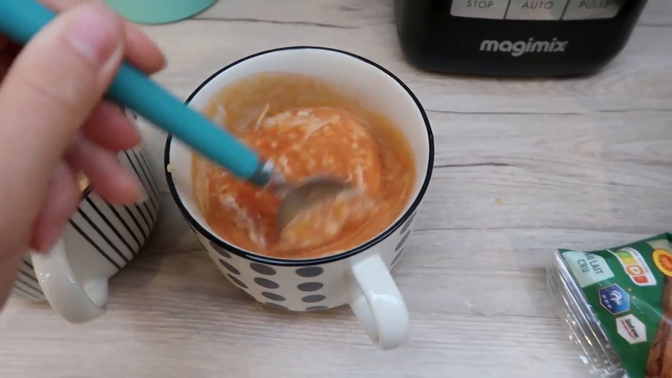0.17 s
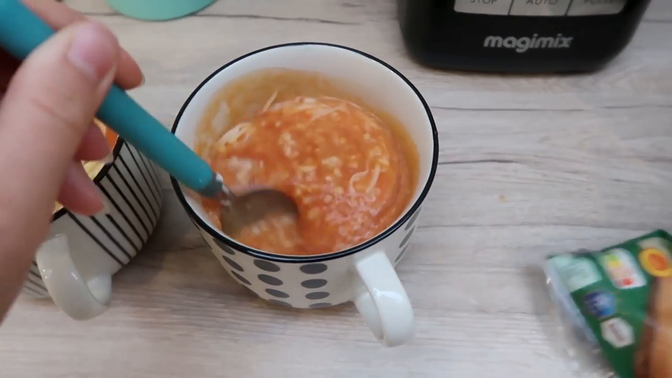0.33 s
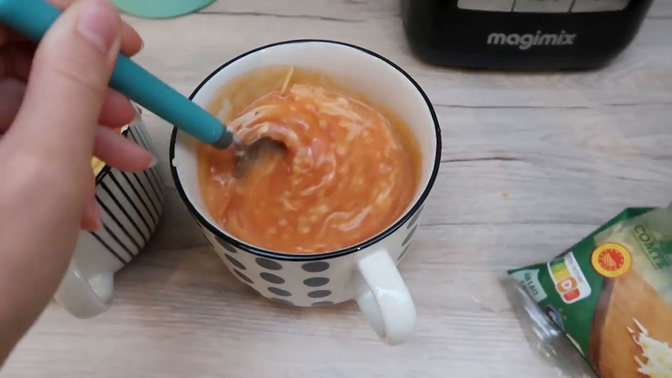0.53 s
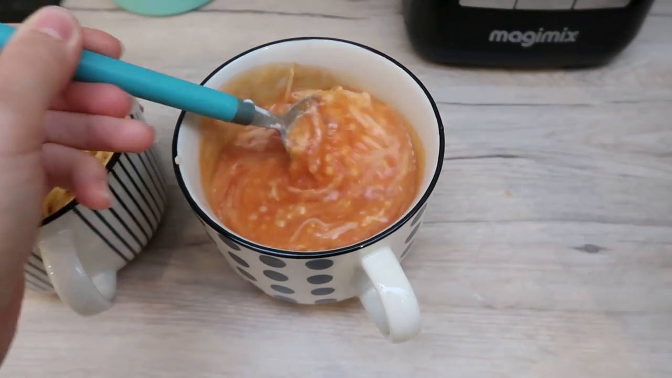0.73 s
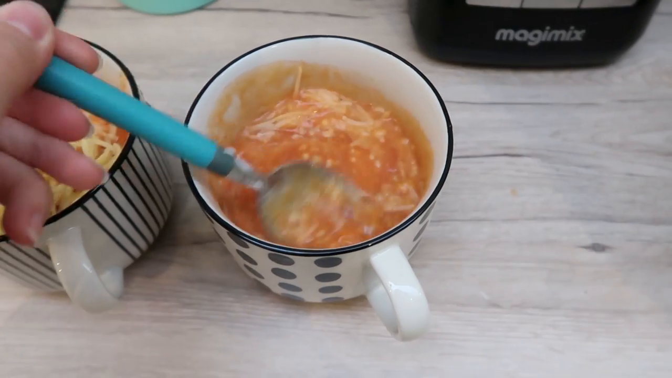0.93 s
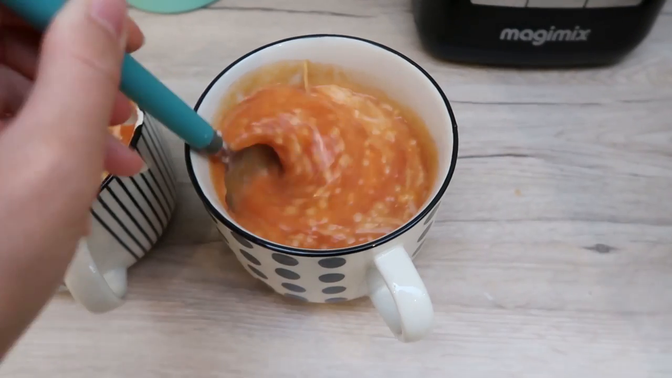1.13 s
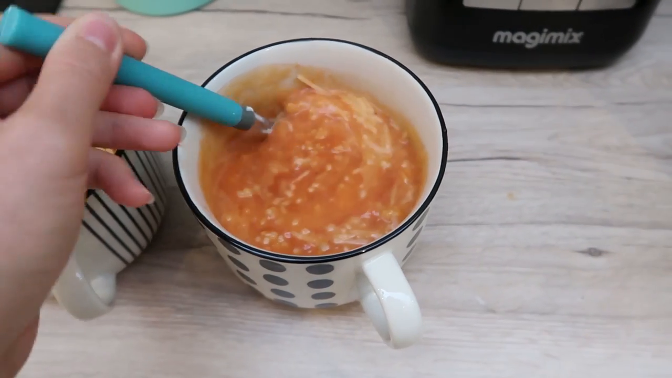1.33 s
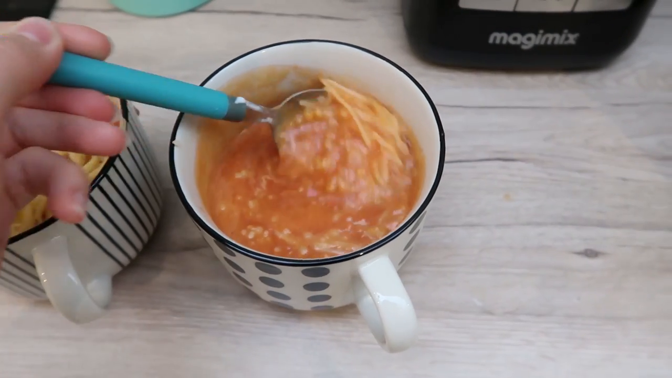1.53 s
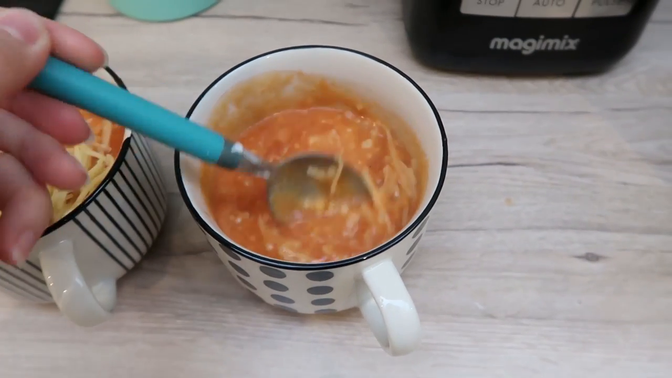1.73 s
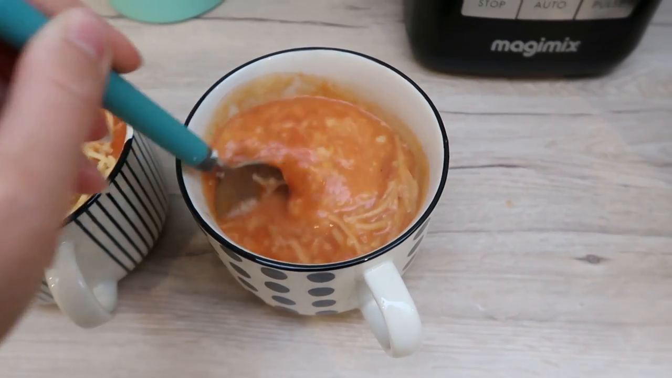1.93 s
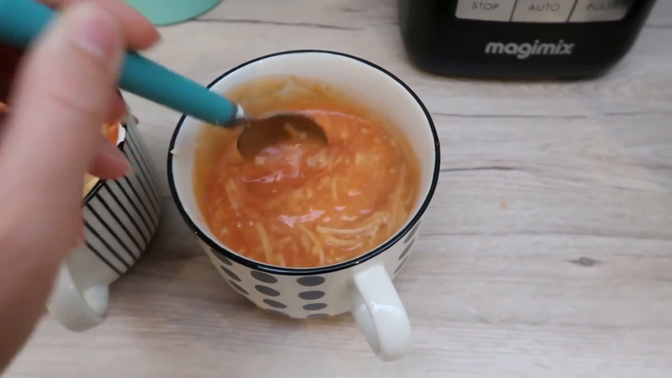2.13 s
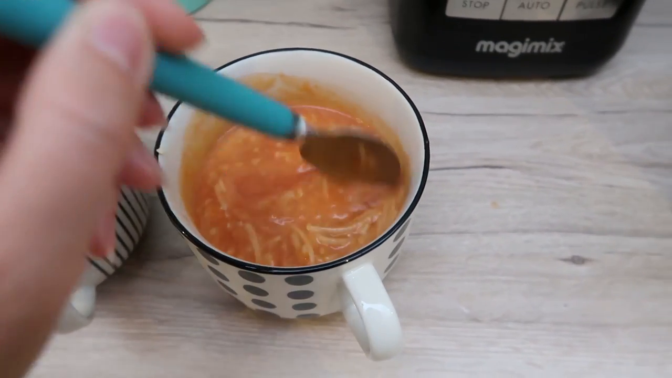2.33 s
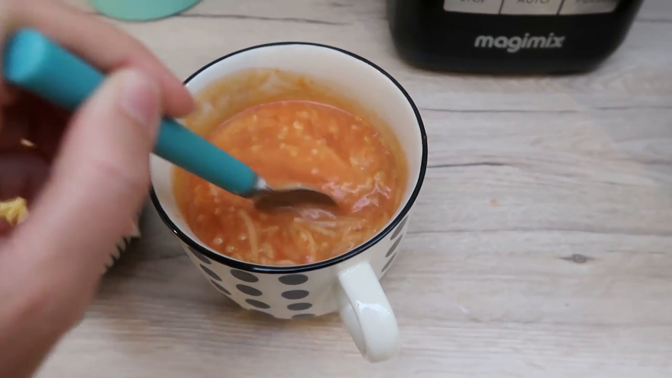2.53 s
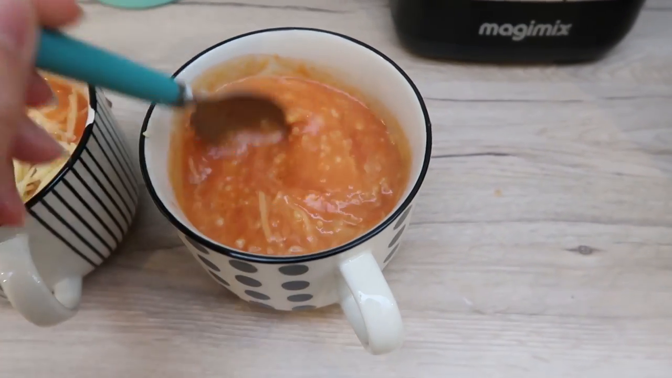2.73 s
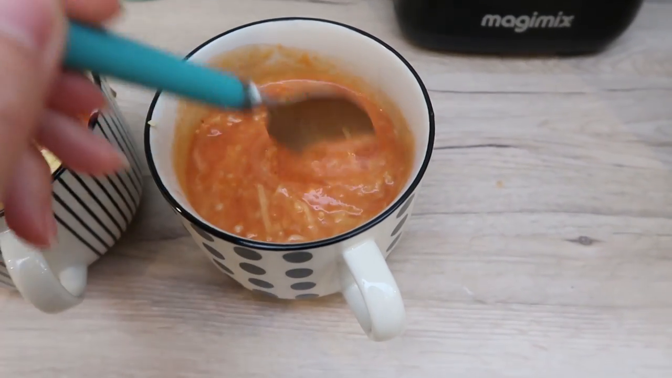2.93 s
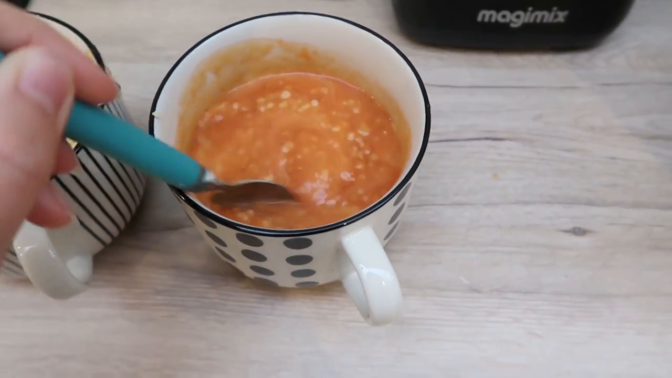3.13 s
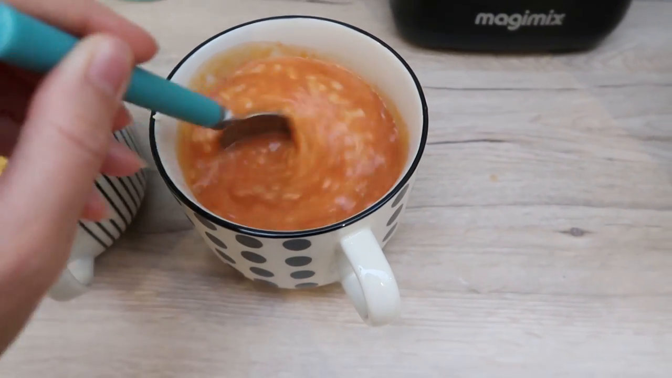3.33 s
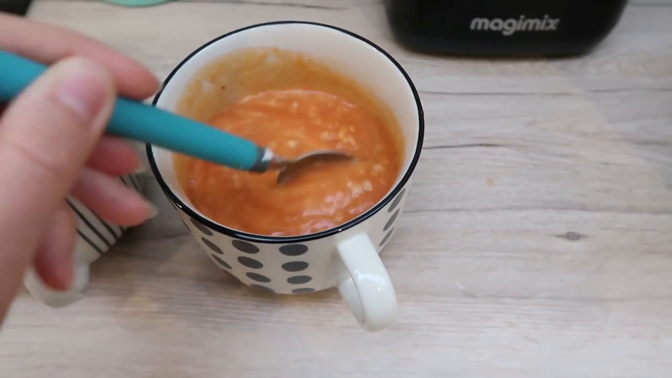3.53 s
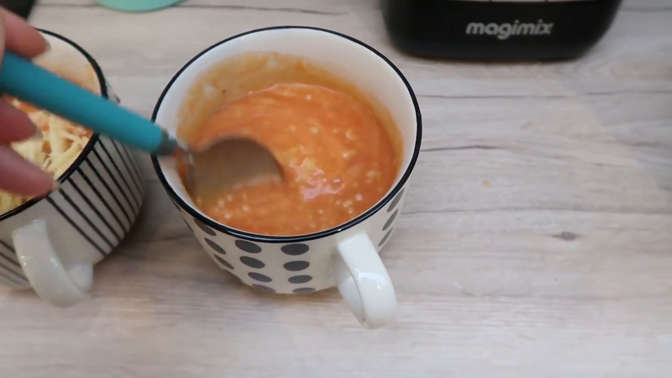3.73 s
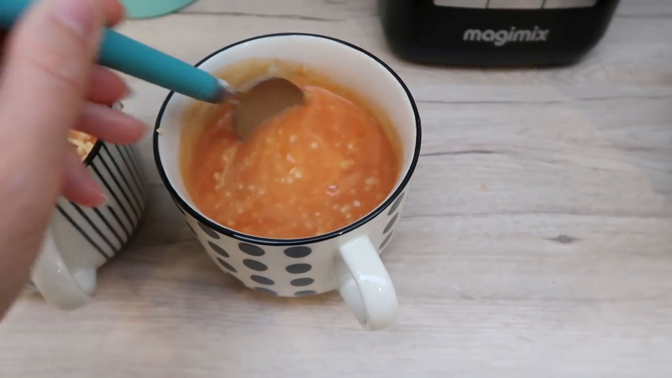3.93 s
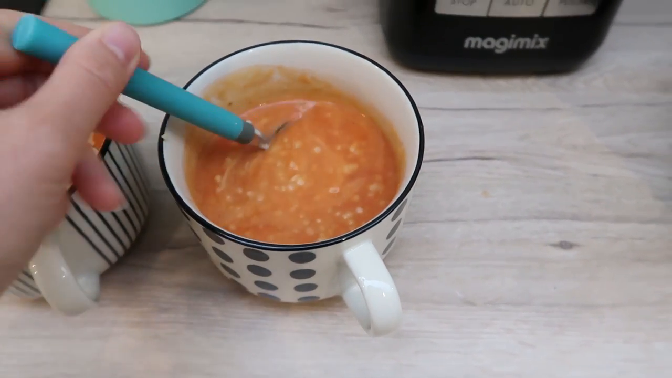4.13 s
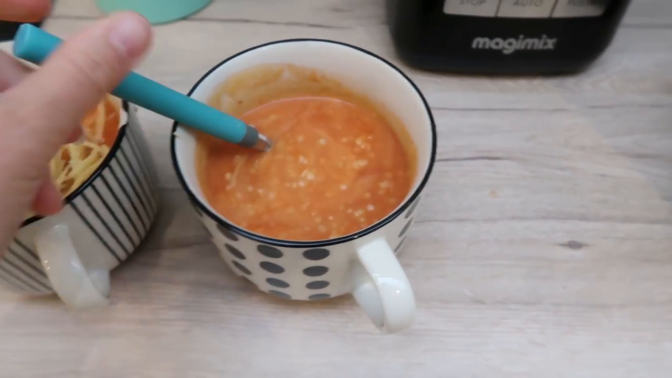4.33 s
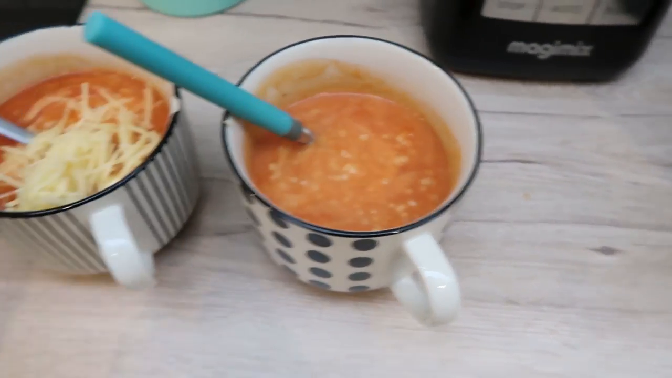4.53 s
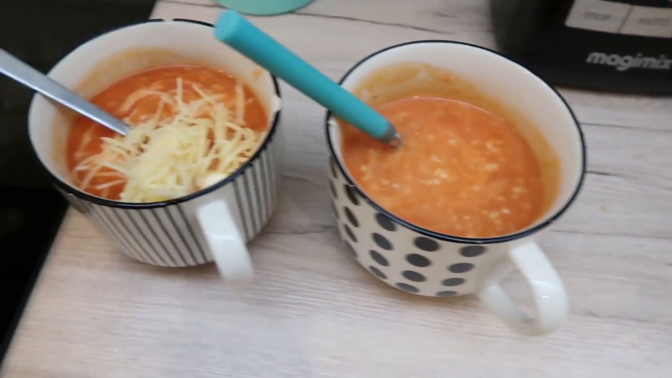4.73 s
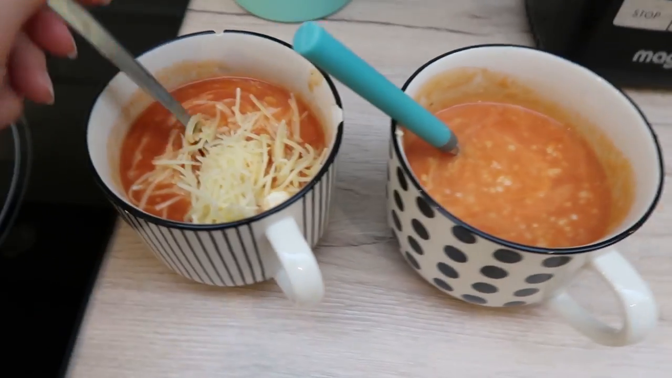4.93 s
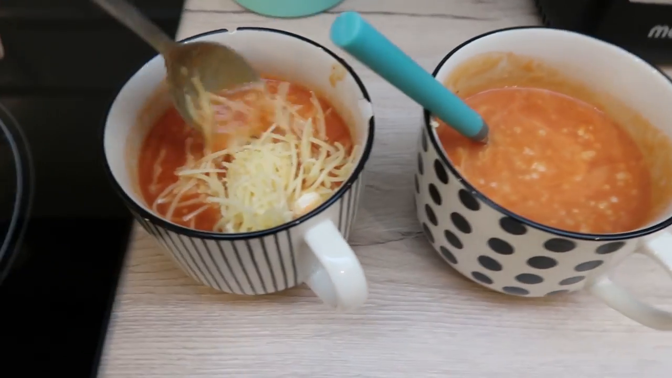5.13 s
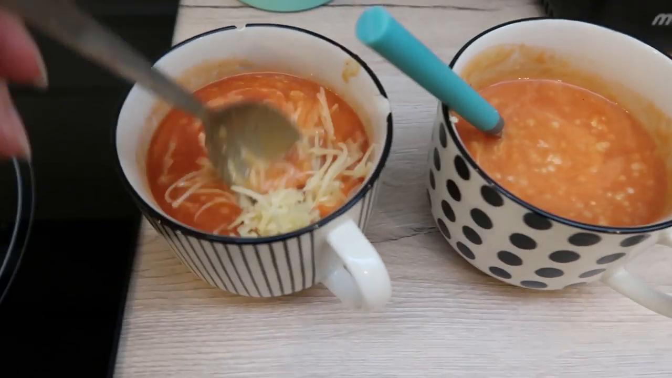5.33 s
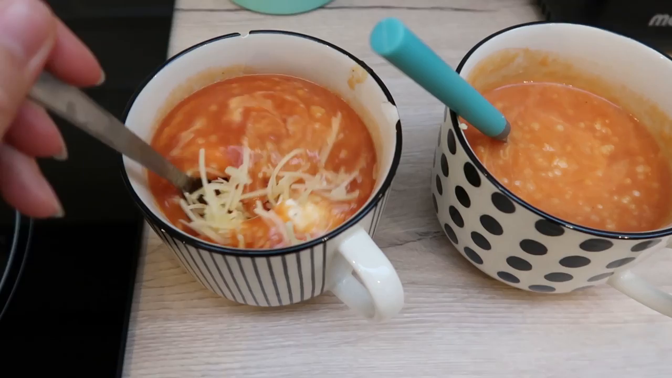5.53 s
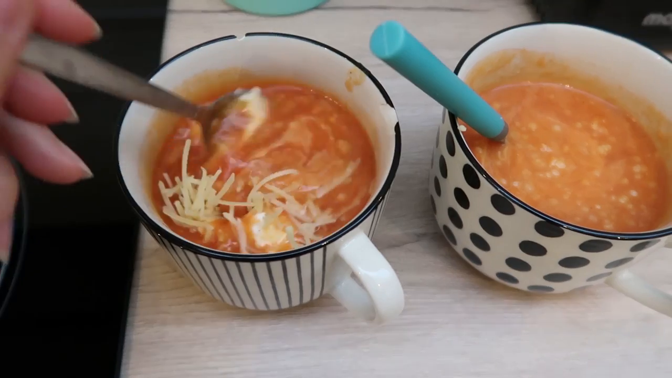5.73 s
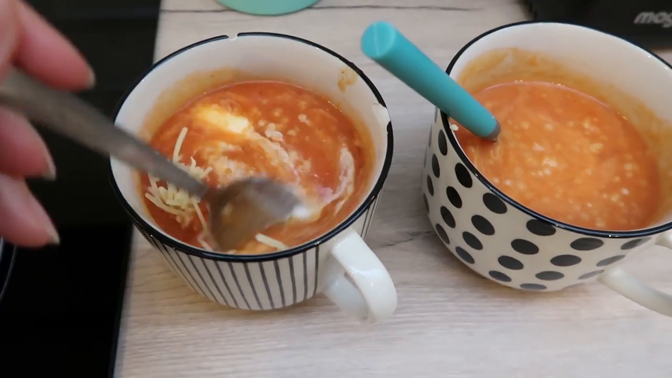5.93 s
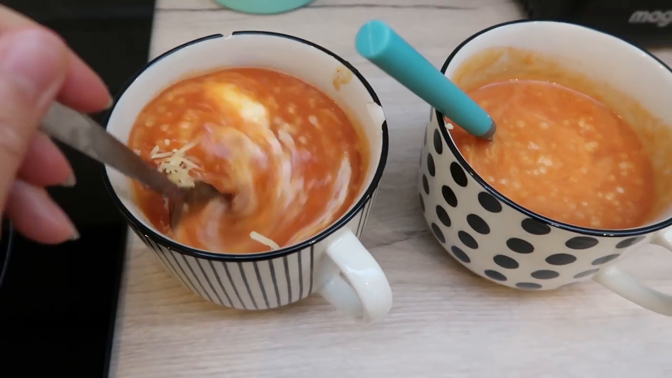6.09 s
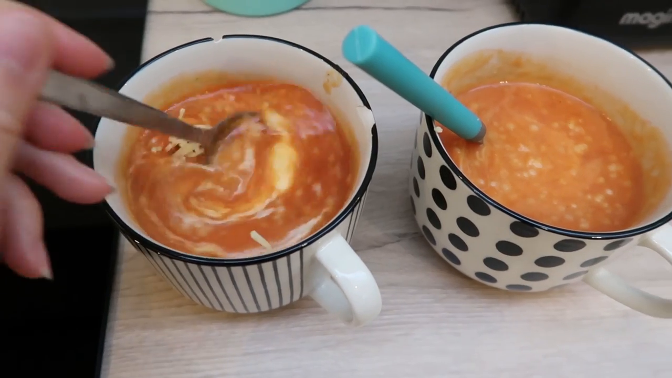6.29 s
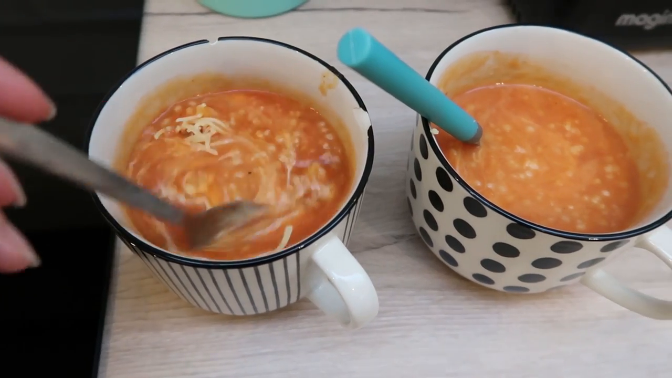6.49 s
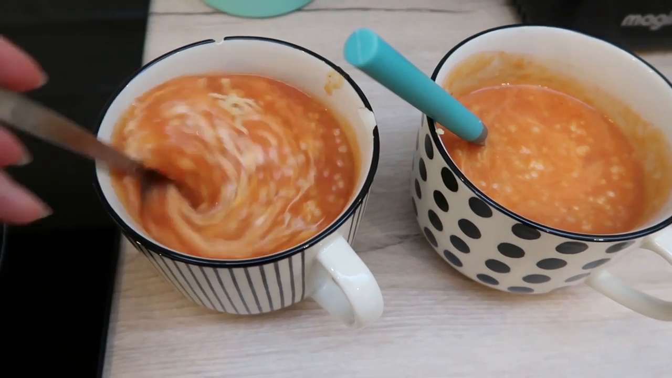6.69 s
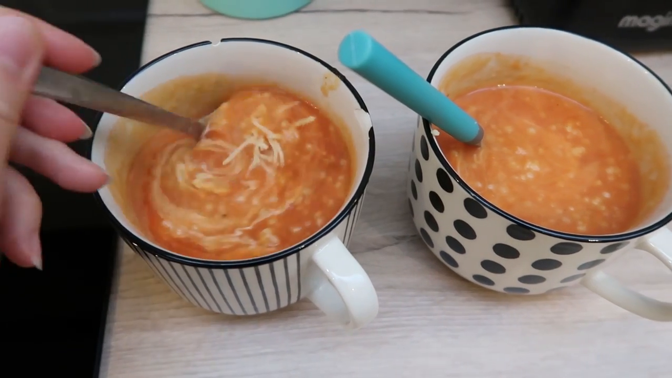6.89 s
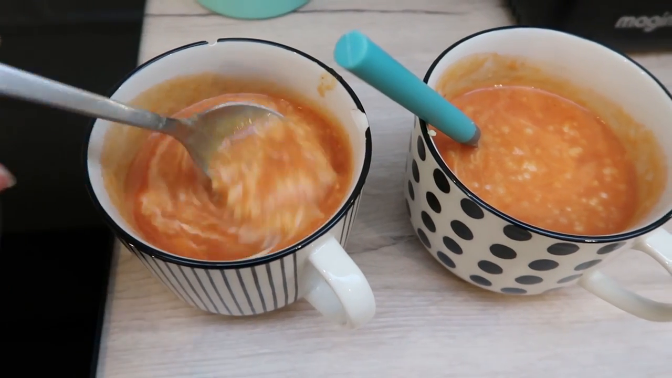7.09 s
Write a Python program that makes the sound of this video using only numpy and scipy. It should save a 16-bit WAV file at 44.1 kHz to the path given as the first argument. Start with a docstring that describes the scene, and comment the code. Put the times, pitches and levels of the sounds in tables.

```python
"""Stirring two mugs of soup

A metal spoon stirs thick soup in a ceramic mug on a worktop, then a second mug is stirred: damped modes
and noise cracks make short clacks. A plastic packet crinkles in pitched ticks and noise bursts; shaped
noise scrapes, shifts things further off and rubs softly; the soup gulps and sine tones hum. Echoes of
near surfaces and a small hard room's tail answer; two close ports pick it all up.
"""
import sys
import numpy as np
from scipy import signal
from scipy.fft import rfft, irfft, next_fast_len
from scipy.io import wavfile
from scipy.ndimage import map_coordinates

SR = 44100
rng = np.random.default_rng(int(sys.argv[2]) if len(sys.argv) > 2 else 0)


def transcribe(signal):
    """Save signal, clipped to [-1, 1], as a 16-bit WAV file at the path in sys.argv[1]."""
    frames = np.atleast_2d(signal).T
    limited = np.clip(frames, -1, 1)
    pcm = np.round(limited * 32767).astype(np.int16)
    wavfile.write(sys.argv[1], SR, pcm)


N = 315329
TIME_S = np.arange(N) / SR
AGE_S = TIME_S[:SR // 3]  # time since the onset of one short sound
TOP_HZ = 15900

# Background air. Each row: frequency in Hz, relative level in dB.
AIR_COLOUR = [(26, -42), (45, -18), (65, -1), (139, -4), (406, -13), (494, -14.5), (662, -21.5),
              (1410, -24), (1760, -28), (2090, -27), (2250, -28), (2730, -28), (7450, -38), (13100, -46.5),
              (15500, -45)]
AIR_DB = -48.5
# Appliance tones. Each row: frequency in Hz, rms level in dB, unsteadiness (ratio).
HUM_TONES = [(37.5, -49.5, 0.35), (100, -54.5, 0.6), (117, -58, 0.7), (13060, -87, .6)]

# A heavy thing slides. Each row: time in s, level in dB before SLIDE_GAIN_DB.
SLIDE_PATH = [(2.965, -45), (2.984, -34), (3.032, -44), (3.07, -29), (3.13, -35), (3.206, -42),
              (3.254, -40), (3.28, -33.5), (3.318, -42), (3.36, -56)]
SLIDE_GAIN_DB = -2
# Spectrum of the slide. Each row: frequency in Hz, relative level in dB.
SLIDE_COLOUR = [(53, -26), (90, 3), (168, 2.5), (273, -2.5), (437, 1.5), (467, -2), (562, -1), (870, 0),
                (2230, -17.5), (3020, -45), (5000, -48), (6500, -40), (11000, -120)]
# Edges in Hz of the registers that judder apart.
SLIDE_EDGES_HZ = [60, 300, 550, 850, 1300, 12000]

# Scrapes, things shifted further off, and the warm tail of the opening knock.
# Each row: start in s, level in dB, resonance in Hz, length in s.
SCUFFS = [(0.02, -28, 990, 0.054), (0.068, -32.5, 1030, 0.079), (0.559, -33, 2400, 0.063),
          (0.71, -36, 2100, 0.043), (0.648, -37.5, 537, .04), (1.271, -37, 1000, 0.021),
          (1.371, -36, 1500, 0.11), (1.429, -31, 990, 0.045), (1.466, -36, 2100, 0.022),
          (1.517, -31.5, 2200, .03), (1.56, -33, 1400, 0.044), (1.768, -29.5, 2240, 0.068),
          (1.868, -36.5, 1190, 0.042), (2.281, -37, 1700, 0.035), (2.455, -24, 1500, .04),
          (2.47, -20, 2090, 0.023), (2.501, -32.5, 1680, 0.057), (2.887, -31.5, 890, 0.066),
          (2.966, -26, 1410, 0.053), (3.0473, -35.5, 504, .05), (3.413, -29.5, 1150, 0.012),
          (3.56, -48.5, 540, 0.047), (3.726, -32.5, 1390, 0.031), (3.799, -39, 1190, 0.051),
          (3.941, -37.5, 780, 0.017), (3.961, -36.5, 2400, 0.019), (3.99, -36.5, 1370, 0.045),
          (4.064, -36, 1120, .04), (4.261, -38.5, 1000, 0.05), (4.354, -32.5, 2300, .03),
          (4.443, -36, 1750, 0.11), (4.488, -33, 3050, 0.046), (4.622, -38.5, 2030, 0.049),
          (4.652, -31.5, 2870, 0.059), (4.694, -39.5, 2300, 0.085), (4.815, -34.5, 2400, 0.065),
          (4.908, -39.5, 1690, .04), (4.927, -35, 860, 0.039), (5.022, -41.5, 1100, 0.022),
          (5.284, -39.5, 1900, 0.036), (5.874, -36.5, 2320, 0.026), (6.08, -37.5, 1380, 0.026),
          (6.304, -38, 1850, 0.037), (6.484, -42, 1000, 0.042), (6.587, -39, 910, 0.045),
          (6.628, -33, 1360, 0.1), (6.76, -38.5, 930, 0.025), (6.995, -38, 1400, 0.019),
          (7.03, -47.5, 710, 0.043)]
# Spectrum of scuffs and rubbing. Each row: frequency in Hz, relative level in dB.
SCUFF_COLOUR = [(76, 2), (130, 11), (146, -2), (175, -48), (255, 3.5), (318, 7), (351, 1), (718, -2.5),
                (948, -5), (2880, -11.5), (11100, -39.5), (13600, -42), (15000, -84)]
SCUFF_RISE_S, SCUFF_T60_S, SCUFF_RESONANCE_DB = .008, .4, 8
SCUFF_LOW_DB, SCUFF_TREBLE_DB = -11.5, -30.5  # for a resonance at 1 kHz
THINNER_DB_PER_OCTAVE, BRIGHTER_DB_PER_OCTAVE = 14, 8

# Soft swells of rubbing: spoon in soup, packet handling, the opening knock dying away.
# Each row: start in s, length in s, level in dB, brightness in dB.
SWELLS = [(0.0, 0.36, -48.5, 6), (0.276, 0.69, -49, 10.5), (0.637, 0.17, -52, -8), (0.876, 0.17, -47, 9),
          (1.26, 0.49, -47, 4.5), (1.796, 0.18, -46.5, 3.5), (1.963, 0.44, -47.5, 1),
          (2.237, 0.86, -54.5, 5), (2.455, 0.32, -41.5, -6), (2.87, 0.67, -48, 4.5),
          (3.73, 0.3, -50.5, 4.5), (4.366, 0.39, -52, 6), (4.682, 0.49, -51.5, 8.5), (5.504, 0.18, -63, 14),
          (5.977, 0.47, -54, -1), (6.217, 0.64, -57, 8), (6.646, 0.61, -54.5, -6)]
SWELL_SKEW = .55  # under 1: the swell peaks early, then eases
IDLE_DB = -64  # friction between swells
RUB_LOW_DB, RUB_TREBLE_DB = -5, -13.5  # against the middle
RUB_LOW_CUT_DB_PER_BRIGHT_DB = 0.053

# Air gulped by the soup. Each row: start in s, frequency in Hz, peak in dB, length in s.
GLOOPS = [(2.882, 214.7, -20, 0.045), (3.05, 178, -28.5, 0.043)]
# Bubbles bursting on the soup. Each row: start in s, frequency in Hz, typical level in dB.
POPS = [(2.8258, 2550, -34)]
SQUELCH_SPAN_S = (2.97, 3.26)  # soup folds over the spoon: start and end in s
SQUELCH_HZ, SQUELCH_LOG_SPREAD, SQUELCH_DB = 850, .55, -34  # typical pitch, its spread, typical level

CRINKLE_SPAN_S = (.39, .755)  # the packet is lifted: start and end in s
# Crinkle rms level in dB: low, middle, treble before it dulls.
CRINKLE_DB = [-47, -44.5, -39.5]
CRINKLE_DULLS_DB_PER_S = 37
CREASE_HZ, CREASE_LOG_SPREAD, CREASE_CYCLES = 2600, .55, 18  # typical pitch, its spread, t60 in cycles
# Separate snaps of plastic film and soup, from sharp to very faint.
# Each row: start in s, level in dB, crispness in dB, resonance in Hz.
SNAPS = [(0.4177, -33, 1, 3300), (0.4249, -20.5, 8.5, 2950), (0.427, -18.5, -4, 2950),
         (0.431, -18.5, 4, 2480), (0.525, -27, -8, 2000), (0.552, -28, -3, 2800), (0.592, -23.5, 0, 2980),
         (0.6276, -24, -2, 3530), (0.6539, -29, -3, 1700), (0.6628, -21.5, -4, 1100),
         (0.682, -27, -11, 2000), (0.6933, -16, 1.5, 3440), (0.7427, -31, -18, 900),
         (0.7725, -17.5, -18, 1460), (0.7921, -21.5, -16, 1380), (0.808, -19.5, 2.5, 2100),
         (0.8269, -23, -19, 1950), (1.056, -32.5, -6, 1820), (1.149, -23, -8.5, 1490),
         (1.319, -32.5, 0.5, 3480), (1.731, -42, 2.5, 4030), (1.776, -32, -1, 2200), (2.722, -55, 14, 4000),
         (2.814, -51, 14, 5000), (2.904, -31, -11, 1300), (2.971, -34, -6, 1100), (5.457, -61, 20, 4000)]
# Spectrum of snaps and creases. Each row: frequency in Hz, relative level in dB.
SNAP_COLOUR = [(76, -30.5), (130, -1), (282, -12), (454, -2), (637, -23.5), (1330, -2.5), (1790, 1.5),
               (3450, -6), (4460, -14.5), (9310, -20), (15000, -44)]
SNAP_LOW_CUT_DB_PER_CRISP_DB = 0.019

# The spoon drags on the wall and a mode sings. Each row: start in s, length in s, frequency in Hz, level in dB.
DRAGS = [(4.176, 0.06, 850, -42.5), (1.365, 0.06, 860, -46)]
# Bright clinks that ring on. Each row: start in s, peak in dB.
CLINKS = [(0.3776, -11)]
# Mug modes above the soup. Each row: frequency in Hz, relative level in dB.
CLINK_MODES = [(320, -11), (1110, -10), (1450, -8), (1954, -11), (2660, -9), (3090, -1), (3257, 0),
               (3500, -5), (3690, -10), (5010, -12), (5600, -14), (6400, -10), (8441, -27)]
# Modes of the spoon itself. Each row: frequency in Hz, relative level in dB.
STEEL_MODES = [(3246, -6), (6500, -18)]
CLINK_T60_S, STEEL_T60_S = .085, .25  # at 1 kHz

# Spoon against mug; the faint row at 2.85 s is a drip into the soup, voiced the same way. Each row: start in s,
# level in dB, strongest resonance in Hz, next strongest in Hz, resonance with a node at the contact in Hz,
# worktop thud in dB, weight of the blow in dB, hardness in dB.
KNOCKS = [(0.0048, -8.5, 1570, 3300, 2080, 6, 8.5, 10.5), (0.491, -11.5, 1310, 2120, 3180, -24, 4, -7.5),
          (1.1052, -13.5, 1160, 3120, 2040, -3.5, -5.5, -4),
          (1.1085, -17.5, 1460, 1030, 2560, -17, -13, 4.5), (1.2458, -7, 1160, 2230, 1450, -8, 0.5, -5.5),
          (1.9805, -15, 1530, 3130, 2570, -8, -8, 4), (2.0815, -8.5, 1320, 2690, 2450, -3.5, -1, -6.5),
          (2.6069, -9.5, 2730, 1830, 2240, 2.5, -1.5, 4.5), (2.8468, -42.5, 1490, 345, 2600, 26.5, 15, -8),
          (3.261, -24.5, 912, 2630, 1820, 2, 4, 2), (3.2785, -8.5, 2540, 1500, 1780, -8, -3.5, -6),
          (4.1699, -21.5, 940, 2600, 1550, 9.5, 2.5, -7.5), (4.201, -30.5, 830, 2420, 1490, -3, 10.5, -5),
          (4.348, -11.5, 1440, 2340, 3000, 5.5, 4, -4.5), (4.353, -20.5, 1490, 2500, 2010, 17.5, 6, -3),
          (4.3661, -20, 1800, 2260, 1310, -1, 3, -14), (4.3769, -24.5, 1470, 2750, 2100, 12, 7, -18),
          (4.451, -43, 1950, 3350, 2600, -5, -11, -8), (5.679, -29, 840, 2600, 1980, 2.5, 0.5, -12),
          (6.2094, -8, 1770, 3400, 1180, 5.5, 1.5, 1.5), (6.6269, -23, 4540, 2950, 3830, -14, -23, 10.5),
          (6.8305, -7.5, 850, 2680, 1850, 1.5, -1.5, -2.5), (6.854, -21.5, 1490, 4020, 900, -6, -6, -3)]
SECOND_MUG_FROM_S = 5
# Modes of each full mug with its spoon, the lowest shared with the worktop.
# Each row: frequency in Hz, relative level in dB.
FIRST_MUG = [(160, -17), (205, -16.5), (330, 0), (490, 4), (800, -4.5), (920, -5), (1120, -6), (1310, -0.5),
             (1460, 4), (1640, 2.5), (1790, -1), (2020, -1), (2240, -1), (2560, 10.5), (2740, 12),
             (3150, 10.5), (3420, 8), (4350, -8.5), (4950, -9), (5550, -9.5), (6480, -9), (7540, -31)]
SECOND_MUG = [(140, 5), (195, 4.5), (370, 7), (460, 3.5), (885, -1.5), (1380, 8.5), (1510, 11), (1720, 6),
              (1900, 1.5), (2220, 5.5), (2640, 15), (3150, 16.5), (3430, 12.5), (3750, 9.5), (4100, 2),
              (5050, -6.5), (5700, -3), (7100, -3.5), (7900, -9)]
# Flexing modes of each rim, which the soup damps least. Each row: frequency in Hz, dB against the knock level.
FIRST_RIM = [(880, -26), (2240, -27), (2600, -44), (3300, -45)]
SECOND_RIM = [(890, -23), (1460, -34), (1590, -30), (1980, -33), (2680, -26), (3390, -26)]
FIRST_T60_S, SECOND_T60_S, RIM_T60_S = .023, .025, .13  # at 1 kHz
# Steel on glaze. Each row: frequency in Hz, relative level in dB.
CRACK_COLOUR = [(250, -25), (620, -20), (1400, 2), (3500, 22), (7000, 5), (11000, 3), (15000, 4)]
# An average blow, dB against the knock level: thud, base, belly, wall, rim, tick.
BLOW_DB = [-27.5, -24, -22, -18, -17.5, -22.5]
BELLY_DB_PER_WEIGHT_DB, RIM_DB_PER_HARDNESS_DB = 0.11, 0.32
HOLLOW_HZ, HOLLOW_DB = 665, -36  # the mug hardly radiates between its base and belly modes

# Band edges in Hz for knocks and for noises.
KNOCK_EDGES_HZ = [100, 260, 650, 1200, 2100, 4200, 16000]
NOISE_EDGES_HZ = [130, 900, 4200, 16000]

# Room decay. Each row: frequency in Hz, t60 in s.
ROOM_T60 = [(120, 0.36), (700, 0.3), (2000, 0.29), (5000, 0.2), (12000, 0.091)]
# Near surfaces. Each row: delay in s, level in dB.
WALLS = [(.0063, -12), (.0098, -20), (.0135, -20), (.0165, -21)]
# Diffuse sound. Each row: frequency in Hz, side against mid in dB.
WIDTH = [(40, -65), (150, -17), (400, -8.5), (1400, -11.5), (3000, -5.5), (6000, -0.5), (12000, 9)]
# Lead of the left port, for mugs and for packet. Each row: frequency in Hz, phase in radians.
MUG_PHASE = [(1000, 0), (3500, .15), (6000, .8), (9000, 1.6), (14000, 2)]
PACKET_PHASE = [(500, 0), (1900, -.25), (3600, -.7), (7000, -1.5), (11000, -2.4)]
# Share of the mugs' sound that fills the room. Each row: frequency in Hz, gain in dB.
TAIL_COLOUR = [(150, 1), (400, -1.5), (900, 3), (1500, -3), (2600, -4.5), (6000, -1.5)]
ROOM_AIM = .4  # the room is fed from all sides of the mug: only this share of the contact's colouring
# Microphone response. Each row: frequency in Hz, gain in dB.
MICROPHONE = [(15, -30), (32, 0), (11000, 0), (15900, -9)]


def amp(db):
    """Decibels to gain."""
    return 10 ** (np.asarray(db) / 20)


def unit(x):
    """Scale to rms 1."""
    return x / np.sqrt(np.mean(x ** 2) + 1e-20)


def fade(t60_s, t_s=AGE_S):
    """Exponential decay, down 60 dB after t60_s."""
    return np.exp(-np.log(1000) * t_s / np.maximum(t60_s, 1e-4))


def along(points, hz):
    """Read (Hz, value) points on a log axis."""
    point_hz, value = np.transpose(points)
    return np.interp(np.log(hz + 1), np.log(point_hz + 1), value)


def bump(hz, centre_hz, log_width):
    """Bell curve on a log-frequency axis, 1 at its centre."""
    return np.exp(-(np.log((hz + 1) / centre_hz) / log_width) ** 2)


def wobble(rate_hz):
    """Smooth random curve, rate_hz knots a second."""
    knots = rng.standard_normal(int(N * rate_hz / SR) + 4)
    return map_coordinates(knots, [TIME_S * rate_hz])


def filtered(x, response):
    """Multiply the spectrum by a response of frequency."""
    n = x.shape[-1]
    padded = next_fast_len(n + SR // 8)
    spectrum = rfft(x, padded) * response(np.fft.rfftfreq(padded, 1 / SR))
    return irfft(spectrum, padded)[..., :n]


def noise(colour, size=N):
    """Coloured noise of rms 1."""
    return unit(filtered(rng.standard_normal(size), lambda hz: amp(along(colour, hz))))


def chance_colour(colour, depth_db, count=45):
    """Spectrum with the random resonances of one crease or object."""
    hz = np.geomspace(NOISE_EDGES_HZ[0], NOISE_EDGES_HZ[-1], count)
    return np.column_stack([hz, along(colour, hz) + depth_db * rng.standard_normal(count)])


def bands(x, edges_hz):
    """Causal split into neighbouring bands."""
    filters = [signal.butter(3, pair, "band", fs=SR, output="sos") for pair in zip(edges_hz, edges_hz[1:])]
    return [signal.sosfilt(sos, x) for sos in filters]


def voiced(x, edges_hz, levels_db):
    """Set each band's rms over the first 30 ms of a short sound."""
    early = AGE_S < .03
    parts = bands(x, edges_hz)
    return sum(amp(db) * part / np.sqrt(np.mean(part[early] ** 2)) for db, part in zip(levels_db, parts))


def add(track, start_s, sound):
    """Mix a sound into the track."""
    start = max(round(start_s * SR), 0)
    track[start:start + len(sound)] += sound[:N - start]


def ring(modes, t60_s, scatter_db):
    """Damped modes, high ones dying sooner, strengths and pitches scattered each time."""
    hz, db = np.transpose(modes)
    chance = rng.standard_normal((len(hz), 2))
    db = db + scatter_db * chance[:, 0]
    hz = hz[:, None] * (1 + .008 * chance[:, 1:])
    life_s = t60_s * (1000 / hz) ** .4
    sign = (-1) ** np.arange(len(hz))
    return (sign * amp(db)) @ (np.sin(2 * np.pi * hz * AGE_S) * fade(life_s))


def struck(x):
    """Minimum phase: same spectrum, all parts starting together as after one sharp blow."""
    cepstrum = irfft(np.log(np.abs(rfft(x)) + 1e-6), len(x))
    fold = np.where(AGE_S == 0, 1, 2 * (AGE_S < AGE_S[-1] / 2))
    return irfft(np.exp(rfft(cepstrum * fold)), len(x))


def diffuse(mid, side):
    """Sound from all around: two close ports agree in the bass and part in the treble."""
    side = filtered(side, lambda hz: amp(along(WIDTH, hz)))
    return np.array([mid + side, mid - side])


def room(x):
    """Noise tail that builds up over a few ms; each frequency dies at its own speed."""
    hz, t_s, z = signal.stft(rng.standard_normal((2, SR // 2)), SR, nperseg=256)
    build = 1 - np.exp(-t_s / .005)
    decay = fade(along(ROOM_T60, hz)[:, None], t_s)
    tail = signal.istft(z * decay * build, SR, nperseg=256)[1]
    tail = diffuse(*tail) / np.linalg.norm(tail[0])
    return signal.fftconvolve(x[None], tail, axes=1)[:, :x.size]


def reverberate(x, count=9):
    """Each stretch of sound meets a different room tail."""
    out = np.zeros((2, N + SR))
    for piece in np.array_split(np.arange(N), count):
        wet = room(np.pad(x[piece], (0, SR // 2)))
        out[:, piece[0]:piece[0] + wet.shape[1]] += wet
    return out[:, :N]


def nearby(x, phase, dull_hz=3500):
    """Direct sound meets the two ports out of step; near surfaces return duller copies."""
    def echoes(hz):
        copies = sum(amp(db) * np.exp(-2j * np.pi * hz * delay_s) for delay_s, db in WALLS)
        return copies / (1 + (hz / dull_hz) ** 2)

    def ports(hz):
        return np.exp(np.outer([.5j, -.5j], along(phase, hz)))

    return filtered(x, lambda hz: ports(hz) * (1 + echoes(hz)))


def air():
    """Steady diffuse noise, strongest in the bass."""
    return amp(AIR_DB) * diffuse(noise(AIR_COLOUR), noise(AIR_COLOUR))


def hum():
    """Appliance tones and a faint electronic whine, wavering in level and phase."""
    total = 0
    for hz, db, unsteady in HUM_TONES:
        swell = 1 + unsteady * wobble(6.9)
        phase = 2 * np.pi * hz * TIME_S + 2 * unsteady * wobble(10)
        total = total + amp(db) * unit(swell * np.sin(phase))
    return total


def slide():
    """Dull sliding friction whose registers judder in lumps of their own."""
    time_s, db = np.transpose(SLIDE_PATH)
    level = amp(np.interp(TIME_S, time_s, db, left=-120, right=-120) + SLIDE_GAIN_DB)
    parts = bands(noise(SLIDE_COLOUR), SLIDE_EDGES_HZ)
    lumps = sum(part * amp(1.8 * wobble(70)) for part in parts)
    return level * unit(lumps * amp(1.5 * wobble(120)))


def scuffs(tail_db=-4, middle_db=-12):
    """Gritty noises that swell, ease and linger; a higher resonance is thinner and brighter."""
    track = np.zeros(N)
    for start_s, db, centre_hz, length_s in SCUFFS:
        swell = np.sin(np.pi * np.minimum(AGE_S / length_s, 1) ** SWELL_SKEW)
        linger = amp(tail_db) * (1 - np.exp(-AGE_S / SCUFF_RISE_S)) * fade(SCUFF_T60_S)
        grit = noise(chance_colour(SCUFF_COLOUR, depth_db=2.6, count=80), size=len(AGE_S))
        resonant = filtered(grit, lambda hz: amp(SCUFF_RESONANCE_DB * bump(hz, centre_hz, 0.5)))
        scuff = np.hypot(swell, linger) * resonant
        octaves = np.log2(centre_hz / 1000)
        low_db = SCUFF_LOW_DB - THINNER_DB_PER_OCTAVE * octaves
        treble_db = SCUFF_TREBLE_DB + BRIGHTER_DB_PER_OCTAVE * octaves
        add(track, start_s, amp(db) * voiced(scuff, NOISE_EDGES_HZ, [low_db, middle_db, treble_db]))
    return track * amp(2.6 * wobble(400))


def rubbing():
    """Soft noise in many small catches, rising and easing with each swell."""
    power = np.full((3, N), amp(IDLE_DB) ** 2)
    for start_s, length_s, db, bright_db in SWELLS:
        inside = (TIME_S > start_s) & (TIME_S < start_s + length_s)
        swell = np.sin(np.pi * ((TIME_S[inside] - start_s) / length_s) ** SWELL_SKEW)
        levels_db = [db - RUB_LOW_CUT_DB_PER_BRIGHT_DB * bright_db, db, db + bright_db]
        power[:, inside] += np.outer(amp(levels_db), swell) ** 2
    catches = amp(2.4 * wobble(300) + 1.4 * wobble(40))
    parts = bands(noise(SCUFF_COLOUR) * catches, NOISE_EDGES_HZ)
    gains_db = [RUB_LOW_DB, 0, RUB_TREBLE_DB]
    return sum(amp(db) * np.sqrt(p) * unit(part) for db, p, part in zip(gains_db, power, parts))


def gloops(glide=.03):
    """An air pocket opens behind the spoon: a low tone swells, rises a little and is smothered."""
    track = np.zeros(N)
    for start_s, hz, db, length_s in GLOOPS:
        progress = np.minimum(AGE_S / length_s, 1)
        phase = 2 * np.pi * np.cumsum(hz * (1 + glide * (progress - .5))) / SR
        add(track, start_s, amp(db) * np.sin(np.pi * progress) ** 2 * np.sin(phase))
    return track


def pops(t60_s=0.016):
    """A small bubble rings for a few cycles as it bursts."""
    track = np.zeros(N)
    for start_s, hz, db in POPS:
        add(track, start_s, ring([(hz, db)], t60_s, scatter_db=3))
    return track


def squelch(count=90, cycles=9, rise=.15, spread_db=4):
    """Small air pockets collapse in the thick soup, each a brief rising blip."""
    track = np.zeros(N)
    starts_s = rng.uniform(*SQUELCH_SPAN_S, count)
    for start_s, (size, pitch) in zip(starts_s, rng.standard_normal((count, 2))):
        hz = SQUELCH_HZ * np.exp(SQUELCH_LOG_SPREAD * pitch)
        life_s = cycles / hz
        phase = 2 * np.pi * np.cumsum(hz * (1 + rise * np.minimum(AGE_S / life_s, 1))) / SR
        shape = fade(life_s) * (1 - fade(life_s / 10))
        add(track, start_s, amp(SQUELCH_DB + spread_db * size) * np.sin(phase) * shape)
    return track


def crinkle(count=150, spread_db=4.5):
    """Tiny creases give way, each with its own pitch, ever duller as the packet moves off."""
    track = np.zeros(N)
    starts_s = rng.uniform(*CRINKLE_SPAN_S, count)
    for start_s, (size, pitch) in zip(starts_s, rng.standard_normal((count, 2))):
        hz = min(CREASE_HZ * np.exp(CREASE_LOG_SPREAD * pitch), TOP_HZ)
        tone = np.sin(2 * np.pi * hz * AGE_S) * fade(CREASE_CYCLES / hz)
        hiss = .7 * rng.standard_normal(len(AGE_S)) * fade(.006)
        add(track, start_s, amp(spread_db * size) * (tone + hiss))
    parts = bands(filtered(track, lambda hz: amp(along(SNAP_COLOUR, hz))), NOISE_EDGES_HZ)
    start_s, end_s = CRINKLE_SPAN_S
    held = (TIME_S > start_s) & (TIME_S < end_s)
    low, middle, treble = [amp(db) * part / np.std(part[held]) for db, part in zip(CRINKLE_DB, parts)]
    return low + middle + treble * amp(-CRINKLE_DULLS_DB_PER_S * np.maximum(TIME_S - start_s, 0))


def snaps(low_db=-18, middle_db=-16, treble_db=-20, resonance_db=7):
    """A short burst with a pitch of its own, followed by a weak crackle."""
    track = np.zeros(N)
    for start_s, db, crisp_db, centre_hz in SNAPS:
        crackle = .014 * fade(.07) * rng.exponential(size=len(AGE_S))
        burst = noise(chance_colour(SNAP_COLOUR, depth_db=2), size=len(AGE_S)) * (fade(.01) + crackle)
        burst = filtered(burst, lambda hz: amp(resonance_db * bump(hz, centre_hz, 0.2)))
        levels_db = [low_db - SNAP_LOW_CUT_DB_PER_CRISP_DB * crisp_db, middle_db, treble_db + crisp_db]
        add(track, start_s, amp(db) * voiced(burst, NOISE_EDGES_HZ, levels_db))
    return track


def drags():
    """Friction feeds one mode of the mug: a rough, narrow tone that swells and dies."""
    track = np.zeros(N)
    for start_s, length_s, mode_hz, db in DRAGS:
        tone = unit(filtered(rng.standard_normal(len(AGE_S)), lambda hz: bump(hz, mode_hz, .08)))
        add(track, start_s, amp(db) * tone * np.sin(np.pi * np.minimum(AGE_S / length_s, 1)))
    return track


def clinks():
    """Hard contact above the soup, where little damps the ring; the spoon sings on."""
    track = np.zeros(N)
    for start_s, db in CLINKS:
        strike = 1 + 3 * fade(0.007)  # strongest before the spoon settles
        mug = strike * ring(CLINK_MODES, CLINK_T60_S, scatter_db=1)
        contact = 0.6 * rng.standard_normal(len(AGE_S)) * fade(0.036)
        blow = mug + contact + ring(STEEL_MODES, STEEL_T60_S, scatter_db=1)
        add(track, start_s, amp(db) * blow / np.abs(blow).max())
    return track


def knocks(aim=1, crack_db=-2.5, favour_db=5, second_db=6, node_db=-16, focus_db=3):
    """The spoon cracks on the mug, which rings and thumps the worktop; the spot picks the modes."""
    track = np.zeros(N)
    centres_hz = np.sqrt(np.multiply(KNOCK_EDGES_HZ[:-1], KNOCK_EDGES_HZ[1:]))
    for start_s, db, favoured_hz, second_hz, node_hz, thud_db, weight_db, hardness_db in KNOCKS:
        if start_s < SECOND_MUG_FROM_S:
            mug, t60_s, rim = FIRST_MUG, FIRST_T60_S, FIRST_RIM
        else:
            mug, t60_s, rim = SECOND_MUG, SECOND_T60_S, SECOND_RIM

        def spot(hz):
            favoured = favour_db * bump(hz, favoured_hz, .11) + second_db * bump(hz, second_hz, .06)
            node = node_db * bump(hz, node_hz, .08)
            return amp(aim * (favoured + node) + HOLLOW_DB * bump(hz, HOLLOW_HZ, .14))

        crack = amp(crack_db) * filtered(noise(CRACK_COLOUR, size=len(AGE_S)), spot) * fade(0.025)
        blow = crack + struck(filtered(ring(mug, t60_s, scatter_db=1.5), spot))
        belly_db = BELLY_DB_PER_WEIGHT_DB * weight_db
        rim_db = RIM_DB_PER_HARDNESS_DB * hardness_db
        contact_db = np.array([thud_db, weight_db, belly_db, 0, rim_db, hardness_db])
        # the point of contact favours one register
        register_db = focus_db * np.exp(-(2 * np.log2(centres_hz / favoured_hz)) ** 2)
        bell = aim * ring(rim, RIM_T60_S, scatter_db=2) * (1 - fade(.02))
        body = voiced(blow, KNOCK_EDGES_HZ, BLOW_DB + contact_db + register_db)
        add(track, start_s, amp(db) * (body + bell))
    return track


def scene():
    """Mugs and packet close by, scuffs and rubbing diffuse, all in one room."""
    surrounding = diffuse(*[scuffs() + rubbing() + slide() for _ in range(2)])
    soup = gloops() + pops() + squelch()
    crackling = snaps() + crinkle()
    singing = clinks() + drags()
    close = nearby(knocks() + singing, MUG_PHASE) + nearby(crackling, PACKET_PHASE) + soup
    all_sides = knocks(aim=ROOM_AIM) + ROOM_AIM * singing
    radiated = filtered(all_sides, lambda hz: amp(along(TAIL_COLOUR, hz)))
    tail = reverberate(amp(-10.0) * radiated + amp(-8.5) * crackling + amp(-11.5) * soup)
    return air() + hum() + surrounding + tail + close


def record(dry):
    """The microphones round off the tallest peaks and lose the deepest bass and the top."""
    rounded = dry / (1 + np.abs(dry / .75) ** 4) ** .25
    return filtered(rounded, lambda hz: amp(along(MICROPHONE, hz)) * (hz < TOP_HZ))


dry = scene()
out = record(dry)
transcribe(out)
```